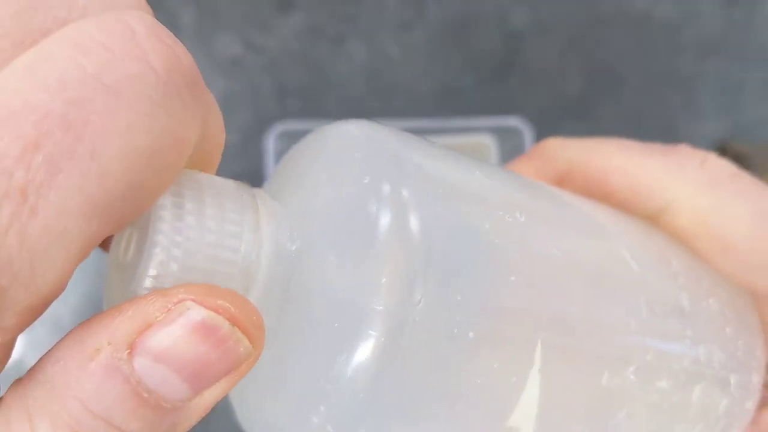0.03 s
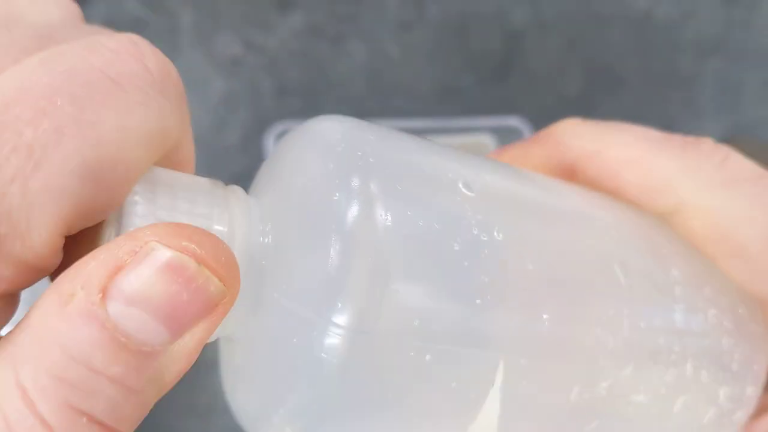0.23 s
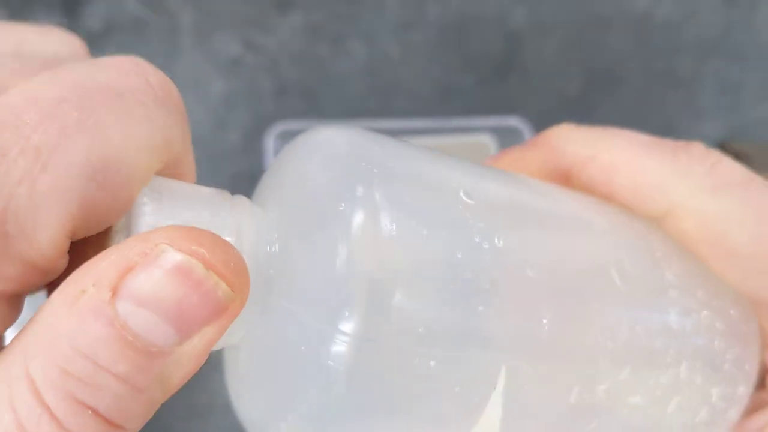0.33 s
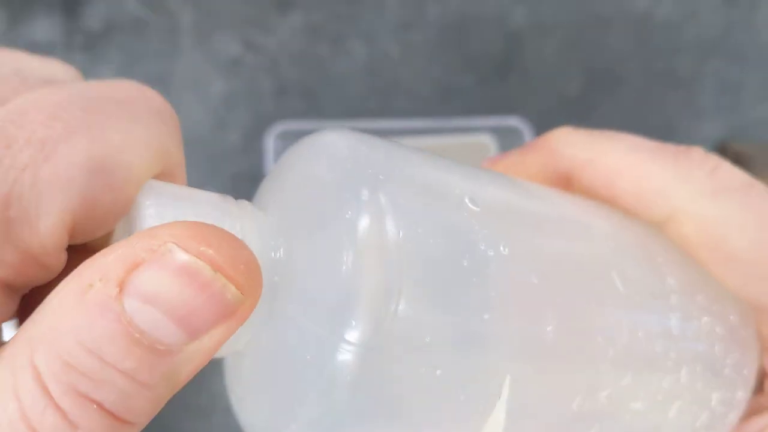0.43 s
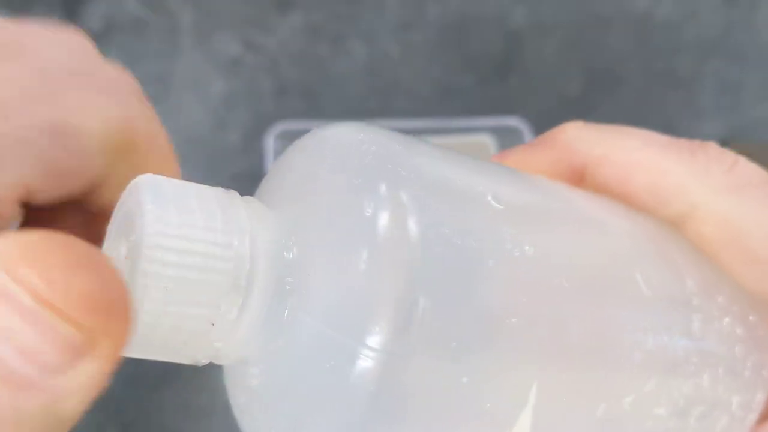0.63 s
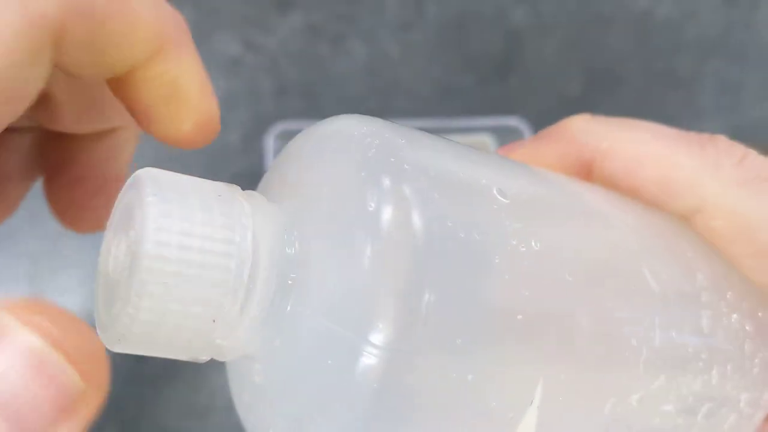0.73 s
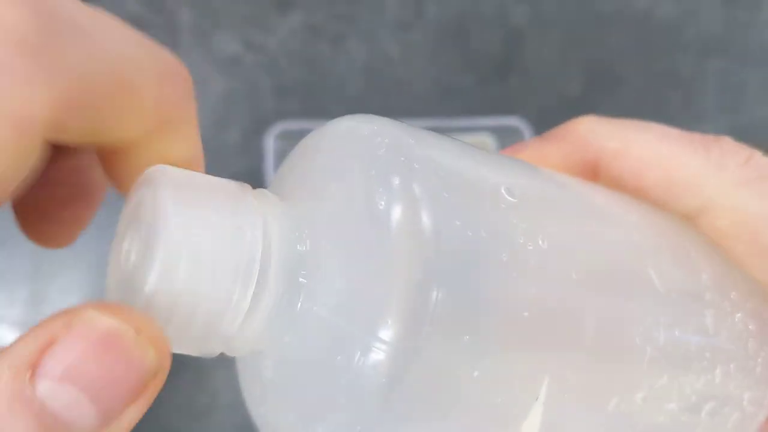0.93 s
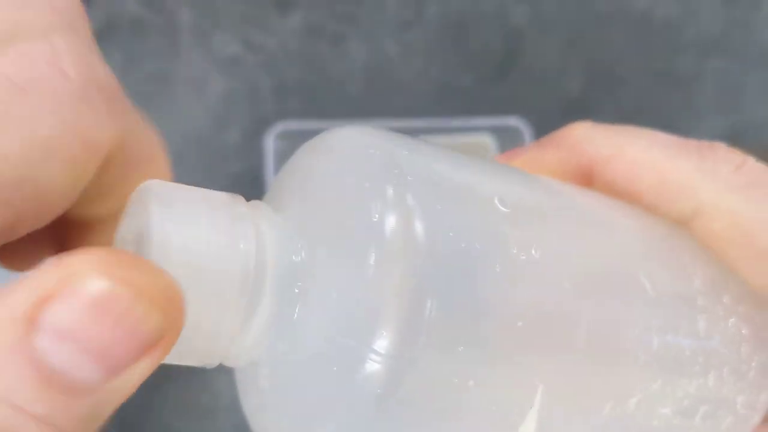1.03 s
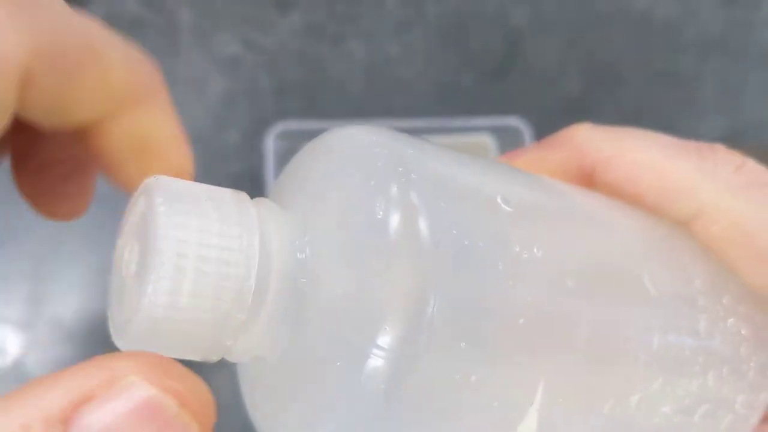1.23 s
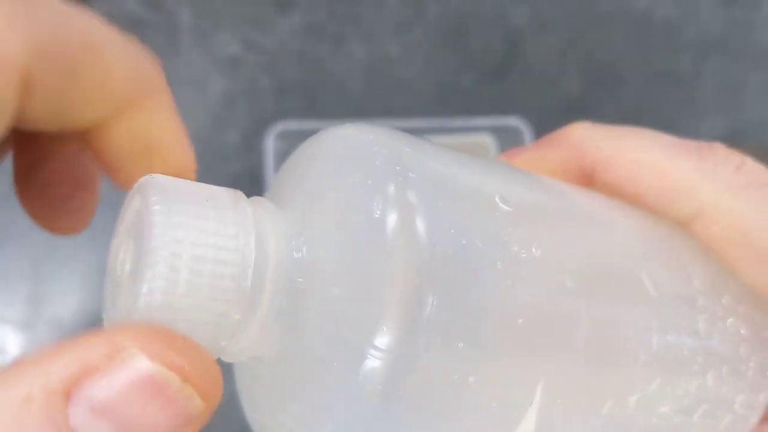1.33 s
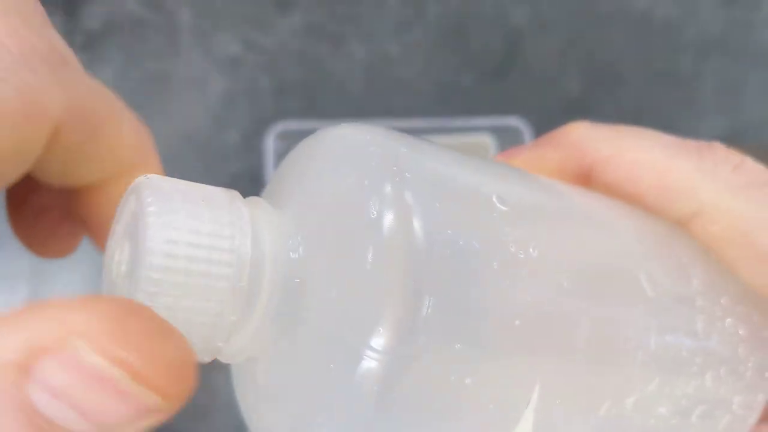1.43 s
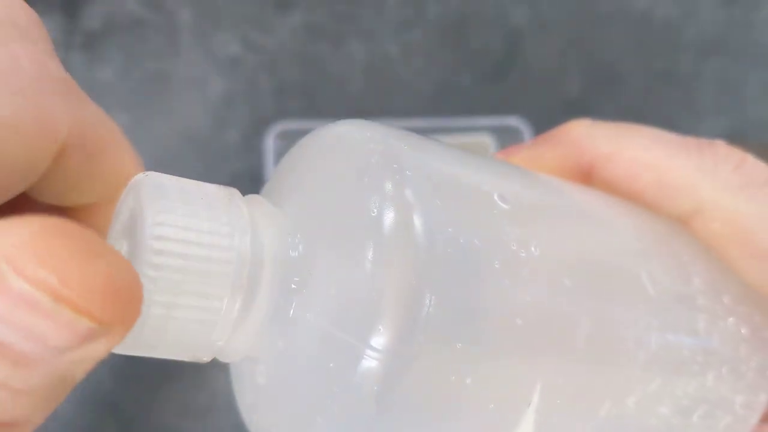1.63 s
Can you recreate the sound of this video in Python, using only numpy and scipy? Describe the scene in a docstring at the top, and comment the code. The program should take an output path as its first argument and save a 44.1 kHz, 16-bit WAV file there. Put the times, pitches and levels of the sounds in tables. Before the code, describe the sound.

Quiet low ventilation rumble and hum indoors. At about 0.23 s a soft tick, then a loud, bright, slightly sputtering gas hiss bursts from a plastic bottle cap, strongest 0.27-0.37 s, gone by 0.47 s with a short room tail. Very faint rubbing near 0.6 s. From 0.97 to 1.16 s, crisp plastic cap clicks, strongest near 0.99 s, with faint finger friction until 1.19 s. Close stereo.

```python
"""A plastic bottle opens with a tick and a burst of hissing gas; then its cap ticks and rubs round in the fingers.
The jet is turbulent noise, shaped separately towards two close microphones. Each tick strikes the cap's modes and
the bottle wall; the rubbing is dense slips over the ribs with smooth friction noise, stirring the same cap modes.
A noise tail makes the room, and filtered noise its ventilation rumble, hiss and hum."""
import sys
import numpy as np
from scipy import signal
from scipy.fft import rfft, irfft, next_fast_len
from scipy.io import wavfile

SR = 44100
rng = np.random.default_rng(int(sys.argv[2]) if len(sys.argv) > 2 else 0)


def transcribe(signal):
    """Save signal, clipped to [-1, 1], as a 16-bit WAV file at the path in sys.argv[1]."""
    frames = np.atleast_2d(signal).T
    limited = np.clip(frames, -1, 1)
    pcm = np.round(limited * 32767).astype(np.int16)
    wavfile.write(sys.argv[1], SR, pcm)


def ratio(d):
    """dB to gain"""
    e = np.asarray(d, float) / 20
    return 10 ** e


N = 74970
SIZE = next_fast_len(2 * N)
HZ = np.maximum(np.arange(SIZE // 2 + 1) * SR / SIZE, 1)

# Stereo rows are always far (left), near (right).
FAR_LAG_S = 0.0002736   # extra travel time to the far microphone
HANDLING_SHARED = 0.61   # share of the handling noise common to both microphones

# resonant modes of the cap: f/Hz, relative level/dB, t60/s
CAP_MODES = [(560, -16, 0.0237), (1750, -12.5, 0.009), (2500, -9, 0.007), (3305, -8, 0.0054),
             (4380, -2, 0.0062), (5410, -1.5, 0.0033), (6930, 2, 0.0021), (8390, -0.5, 0.004)]


def rms_one(x):
    """Scale to rms 1."""
    return x / np.sqrt(np.mean(x ** 2) + 1e-20)


def in_time(rows):
    """Read the columns of a time curve at every sample."""
    s, *columns = np.transpose(rows)
    t = np.arange(N) / SR
    return [np.interp(t, s, column) for column in columns]


def at_hz(points):
    """Read a spectrum on the FFT grid, along log frequency."""
    hz, value = np.transpose(points)
    return np.interp(np.log(HZ), np.log(hz), value)


def coloured(x, points, lag_s=0):
    """Causal (minimum-phase) filter with the given dB response and a delay."""
    cepstrum = irfft(np.log(ratio(at_hz(points))), SIZE)
    # folding the cepstrum onto positive times gives minimum phase
    cepstrum[1:SIZE // 2] *= 2
    cepstrum[SIZE // 2 + 1:] = 0
    response = np.exp(rfft(cepstrum) - 2j * np.pi * HZ * lag_s)
    return irfft(rfft(x, SIZE) * response, SIZE)[..., :N]


def drift(rate_hz):
    """Slow random wandering of rms 1: noise through two equal one-pole low-passes."""
    r = np.exp(-2 * np.pi * rate_hz / SR)
    settle = 8000   # samples dropped while the filter settles
    slow = signal.lfilter([1], [1, -2 * r, r * r], rng.standard_normal(N + settle))
    return rms_one(slow[settle:])


def ring(clicks, hz, t60):
    """Two-pole resonator: a unit click sets a decaying sine of starting height 1 ringing."""
    r, w = ratio(-60 / (t60 * SR)), 2 * np.pi * hz / SR
    return signal.lfilter([0, np.sin(w)], [1, -2 * r * np.cos(w), r * r], clicks + 1e-18)


def partly_shared(draws, share):
    """Mix two noise draws into far and near signals that correlate by the given share."""
    share = np.clip(share, 0, 1)
    near = draws[0]
    far = share * draws[0] + np.sqrt(1 - share ** 2) * draws[1]
    return np.array([far, near])


def gas_jet():
    """Turbulent noise that sputters through the wet thread, duller as the pressure falls."""
    # gas flow past the thread: t/s, level/dB, lift of the part under the split/dB
    flow = [(.2315, -101.5, 28.5), (.2345, -31, 9.5), (.25, -21.5, 4), (.272, -13, -2), (.32, -15, 0.5),
            (.368, -16.5, 0), (.405, -27.5, 8), (.435, -47, 16), (.47, -66.5, 11), (.8, -84, 0)]
    # jet colour towards each microphone: f/Hz, relative level per Hz/dB
    near_colour = [(900, -44), (1500, -27.5), (2500, -26), (4000, -19.5), (5500, -12), (7000, -12),
                   (8500, -4.5), (10000, -2), (12600, 3.5), (13300, -13), (14500, -9.5), (15500, -14.5)]
    far_colour = [(900, -40.5), (2500, -27.5), (4000, -30), (5500, -15), (7000, -13.5), (8500, -12),
                  (10000, -3), (11000, -6), (11800, -11.5), (12600, -1), (13300, -11), (14500, -21.5),
                  (15500, -23)]
    # the low edge fills in as the gap widens: t/s, level under the gap split/dB
    gap_opening = [(.235, -12), (.34, 0)]
    split_hz, gap_split_hz = 8000, 3300
    sputter_db, sputter_hz = -0.5, 250
    shared = 0.77   # share of the noise common to both microphones

    far, near = partly_shared(rng.standard_normal((2, N)), shared)
    far = coloured(far, far_colour, FAR_LAG_S)
    near = coloured(near, near_colour)
    noise = np.array([far, near]) / np.std(near)

    low = signal.sosfiltfilt(signal.butter(2, split_hz, fs=SR, output="sos"), noise)
    high = noise - low
    deep = signal.sosfiltfilt(signal.butter(3, gap_split_hz, fs=SR, output="sos"), low)
    low = low + (ratio(in_time(gap_opening)[0]) - 1) * deep

    flow_db, lift_db = in_time(flow)
    flow_db = flow_db + sputter_db * drift(sputter_hz)
    return ratio(flow_db) * (high + ratio(lift_db) * low)


def ticks():
    """Each tick strikes the cap modes through a soft or hard contact, cracks, and rings and rattles the wall."""
    # ticks of the cap: t/s, level/dB, contact cut-off f/Hz, wall ring f/Hz, ring level re tick/dB
    tick_table = [(0.2332, -19.5, 1700, 845, -21.5), (0.2376, -21, 2600, 1027, -18),
                  (0.9667, -14.5, 10700, 3030, -13.5), (0.9693, -39, 2000, 1062, 11),
                  (0.9875, -7, 11630, 3810, -7.5), (0.9952, -9.5, 8640, 1490, -15),
                  (1.0486, -19, 16120, 4720, -14), (1.0494, -36, 9000, 1445, 2.5),
                  (1.137, -31, 6500, 1750, 5.5), (1.1367, -17.5, 5300, 2680, -11),
                  (1.157, -41, 3500, 1770, 8.5)]
    low_cut_hz, strike_spread_db = 280, 1.5
    crack_db, crack_t60_s = -18, 0.0068
    # the wall's many dull modes, heard as a burst of noise
    rattle_db, rattle_cut_hz, rattle_t60_s = -15, 5500, 0.029
    wall_cycles, wall_swell_s = 22, 0.00032   # cycles until the ring is 60 dB down; swell time constant

    length = 4000   # samples per tick
    t = np.arange(length) / SR
    click = np.eye(1, length)[0]
    caps, walls = np.zeros((2, 2, N + length))
    signs = (-1) ** np.arange(len(CAP_MODES))   # neighbouring modes radiate in opposite phase
    dull = signal.butter(2, [low_cut_hz, rattle_cut_hz], "band", fs=SR, output="sos")
    swell = 1 - np.exp(-t / wall_swell_s)

    for s, db, cut_hz, wall_hz, ring_db in tick_table:
        odds_db = rng.normal(0, strike_spread_db, len(CAP_MODES))   # no two strikes excite the modes alike
        cap = np.zeros(length)
        for (hz, mode_db, t60), odd_db, sign in zip(CAP_MODES, odds_db, signs):
            cap += sign * ratio(mode_db + odd_db) * ring(click, hz, t60) / 2

        noise = rng.standard_normal((2, length))
        crack = partly_shared(np.diff(noise, prepend=0), HANDLING_SHARED)   # differencing brightens it
        crack = crack * ratio(crack_db - 60 * t / crack_t60_s)
        contact = signal.butter(3, [low_cut_hz, min(cut_hz, .45 * SR)], "band", fs=SR, output="sos")

        # the same noise backwards, sides swapped, serves as the rattle
        rattle = signal.sosfilt(dull, partly_shared(noise[::-1, ::-1], HANDLING_SHARED))
        rattle = rattle * ratio(rattle_db - 60 * t / rattle_t60_s)
        wall = rattle + ratio(ring_db) * ring(click, wall_hz, wall_cycles / wall_hz)

        i = int(s * SR)
        caps[:, i:i + length] += ratio(db) * signal.sosfilt(contact, cap + crack)
        walls[:, i:i + length] += ratio(db) * wall * swell
    return caps[:, :N], walls[:, :N]


def rubbing():
    """Dense little slips over the ribs on top of smooth friction noise; they stir the cap modes by turns."""
    # skin and thread rubbing while the cap turns: t/s, level/dB
    turn = [(.51, -80), (.555, -59), (.57, -55.5), (.625, -57), (.645, -70), (.7, -100), (.955, -87),
            (.975, -57.5), (1.0, -48), (1.04, -47.5), (1.1, -47), (1.14, -43.5), (1.172, -48), (1.188, -70),
            (1.22, -102)]
    # rubbing colour: f/Hz, relative level per Hz/dB
    rub_colour = [(300, -7), (900, -9), (1700, -3.5), (3300, -2), (5000, -3.5), (6900, -1.5), (10000, -4),
                  (16000, -17.5)]
    slips_per_s, slip_spread_db = 6000, 2.0
    smooth = 1.2   # friction noise against the slips' rms
    chatter_db, chatter_swing_db, chatter_hz = -5, 4, 19.5
    flicker_db, flicker_hz = 1.2, 120.0

    happens = rng.random((2, N)) < slips_per_s / SR
    size = ratio(slip_spread_db * np.minimum(rng.exponential(1, (2, N)), 4))
    slips = rms_one(happens * size * rng.choice([-1, 1], (2, N)))
    friction = partly_shared(slips + smooth * rng.standard_normal((2, N)), HANDLING_SHARED)

    chatter = np.zeros((2, N))
    for hz, _, t60 in CAP_MODES[1:]:   # all but the lowest mode, each waxing and waning
        chatter += rms_one(ring(friction, hz, t60)) * ratio(chatter_swing_db * drift(chatter_hz))

    rub = rms_one(coloured(friction, rub_colour)) + ratio(chatter_db) * rms_one(chatter)
    level_db = in_time(turn)[0] + flicker_db * drift(flicker_hz)
    return ratio(level_db) * rms_one(rub)


def room(x):
    """Diffuse tail: convolution with dying noise, a separate draw on each side."""
    level_db, t60_s, gap_s = -14.5, .7, 0.0052   # the gap is silence ahead of the tail
    t = np.arange(N) / SR
    tail = rng.standard_normal((2, N)) * ratio(-60 * t / t60_s) * (t > gap_s)
    tail = tail / np.linalg.norm(tail, axis=1, keepdims=True)
    return ratio(level_db) * irfft(rfft(x, SIZE) * rfft(tail, SIZE), SIZE)[:, :N]


def ventilation():
    """Steady noise, rumbling and hissing, alike on both sides in the bass, with a wavering narrow-band hum."""
    # ventilation and microphone noise: f/Hz, relative level per Hz/dB
    air_colour = [(25, -35.5), (52, -14), (100, -11), (157, 1), (242, -9), (363, -14), (394, -20.5),
                  (531, -17), (659, -21.5), (911, -28.5), (2610, -30.5), (2910, -40), (7000, -49),
                  (11000, -48.5), (16000, -56)]
    # left-right likeness: f/Hz, correlation (-1 to 1)
    likeness = [(100, 0.9), (380, 0.78), (950, 0.29), (2380, -0.24), (5980, -0.05), (15000, 0.06)]
    # left-right balance: f/Hz, left minus right level/dB
    balance = [(150, 2.5), (950, 0.5), (9000, 2.5), (15000, 6)]
    air_db = -45.5
    hum_hz, hum_width_hz, hum_db = 127.3, 10, -51

    mid, side = rfft(rng.standard_normal((2, SIZE))) * ratio(at_hz(air_colour))
    alike = np.clip(at_hz(likeness), -1, 1)
    mid, side = np.sqrt(1 + alike) * mid, np.sqrt(1 - alike) * side
    lean = ratio(at_hz(balance) / 2)
    air = rms_one(irfft([(mid + side) * lean, (mid - side) / lean], SIZE)[:, :N])

    hum = ring(rng.standard_normal(N + 8000), hum_hz, 2.8 / hum_width_hz)[8000:]
    return ratio(air_db) * air + ratio(hum_db) * rms_one(hum)


def scene():
    """Jet, cap and bottle wall along each microphone's path, plus room and ventilation."""
    # shading of the handling sounds on the way to the far microphone: f/Hz, level/dB
    far_shade = [(900, -3.5), (2500, 3.5), (4000, -2), (7000, -2), (8500, -16), (12000, -1), (15500, -20)]
    wall_lag_s = .00005
    caps, wall = ticks()
    far, near = rubbing() + caps
    far = coloured(far, far_shade, FAR_LAG_S) + coloured(wall[0], far_shade, wall_lag_s)
    bottle = gas_jet() + [far, near + wall[1]]
    to_room = coloured(bottle[1], [(3000, 0.0027), (12000, -20)])   # treble loss: f/Hz, level/dB
    return bottle + room(to_room) + ventilation()


def band_limit(x):
    """A steep low-pass at the top of the band."""
    return signal.sosfilt(signal.butter(12, 16890, fs=SR, output="sos"), x)


def record(dry):
    """Port resonances on the near (right) microphone, softly rounded peaks and band limits."""
    # port resonances of the near microphone: f/Hz, level/dB
    near_port = [(9800, 1), (11000, 4.5), (11800, 8.5), (12600, -2), (13300, 3.5), (14500, 2),
                 (15500, 12.5)]
    top = 1.3   # ceiling that the peaks bend towards
    low_cut_hz, high_cut_hz = 42, 15700
    mics = np.array([dry[0], coloured(dry[1], near_port)])
    mics = top * np.tanh(mics / top)
    mics = signal.sosfilt(signal.butter(3, low_cut_hz, "high", fs=SR, output="sos"), mics)
    mics = signal.sosfilt(signal.ellip(12, .3, 60, high_cut_hz, fs=SR, output="sos"), mics)
    return band_limit(mics)


dry = scene()
out = record(dry)
transcribe(out)
```